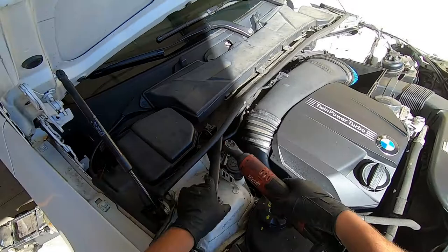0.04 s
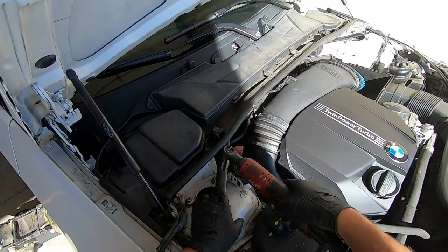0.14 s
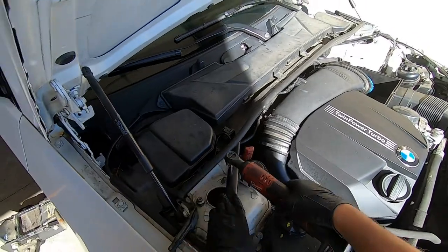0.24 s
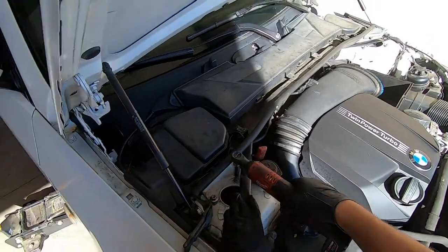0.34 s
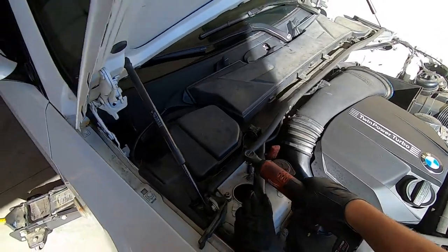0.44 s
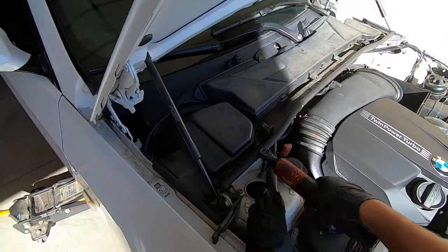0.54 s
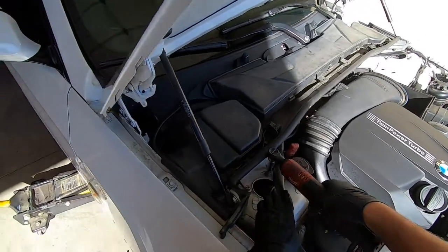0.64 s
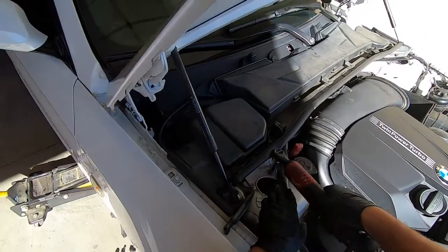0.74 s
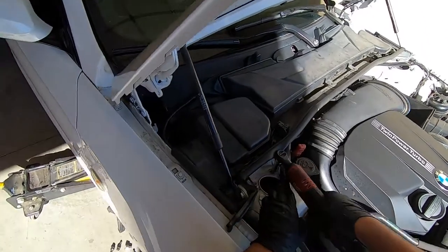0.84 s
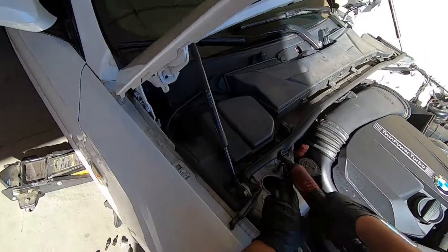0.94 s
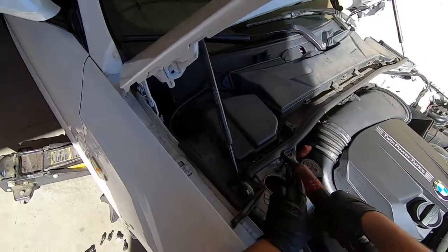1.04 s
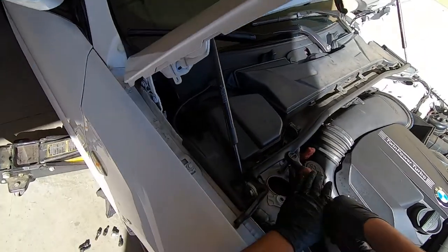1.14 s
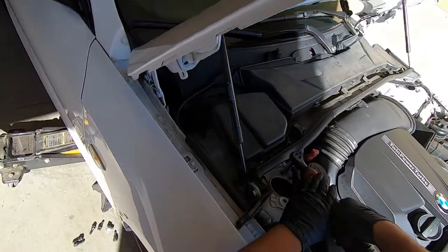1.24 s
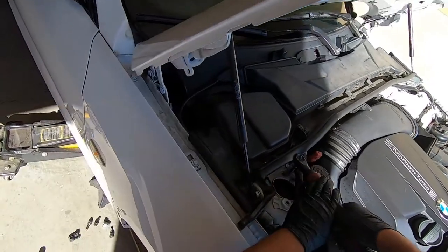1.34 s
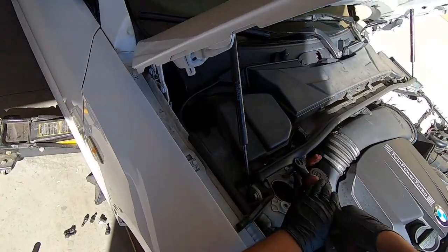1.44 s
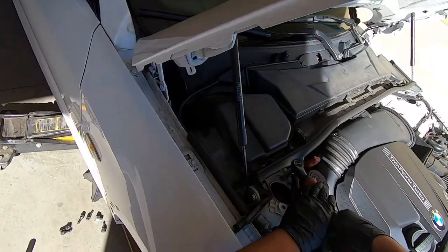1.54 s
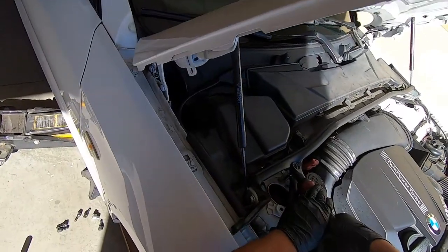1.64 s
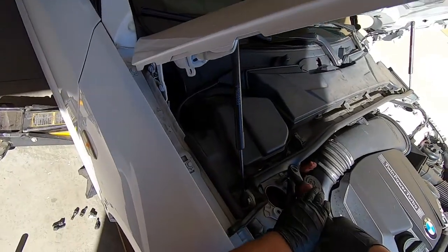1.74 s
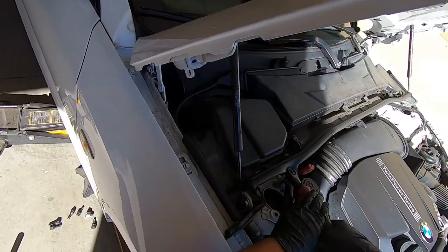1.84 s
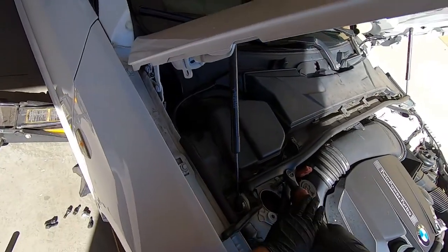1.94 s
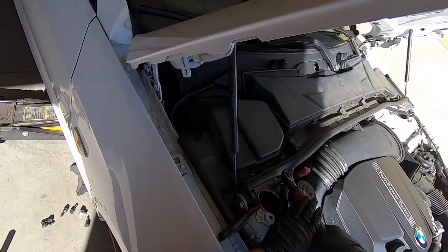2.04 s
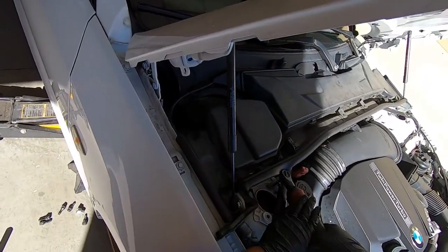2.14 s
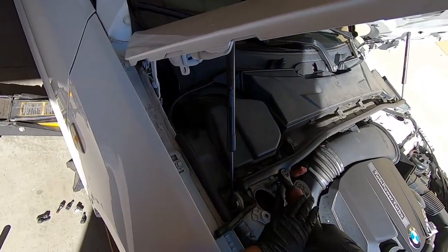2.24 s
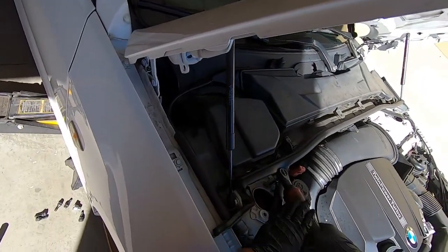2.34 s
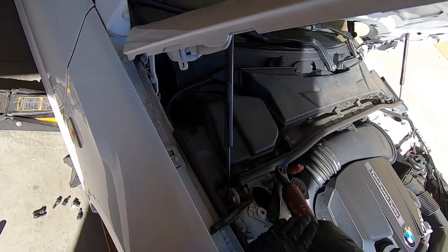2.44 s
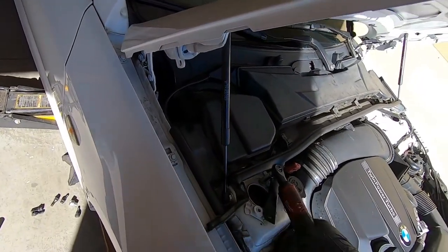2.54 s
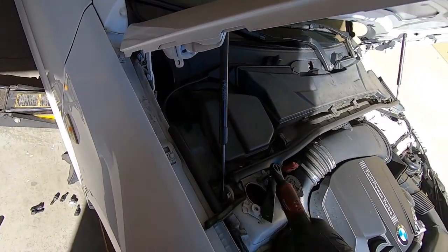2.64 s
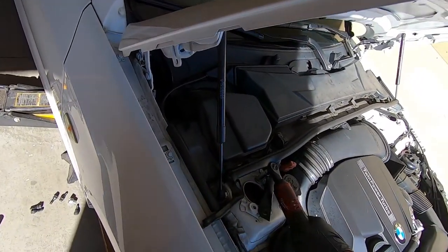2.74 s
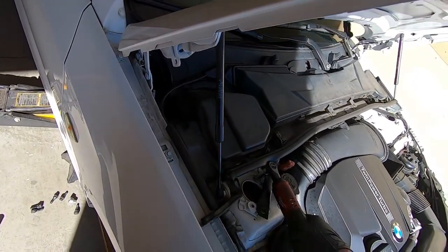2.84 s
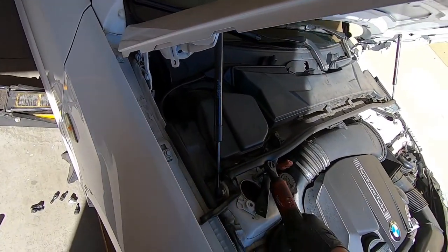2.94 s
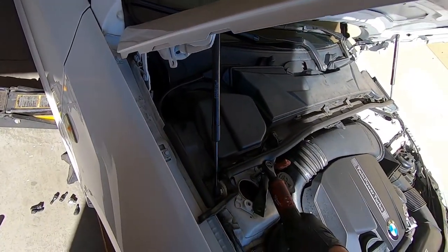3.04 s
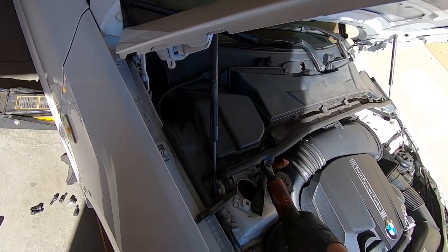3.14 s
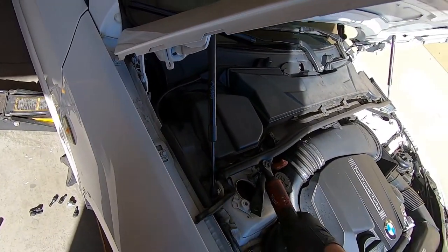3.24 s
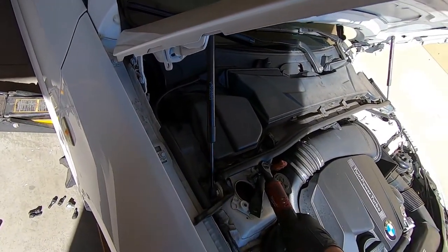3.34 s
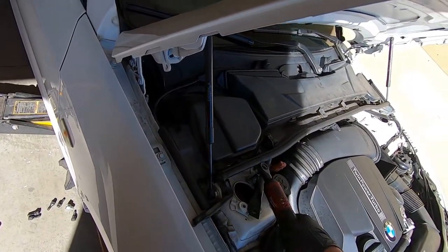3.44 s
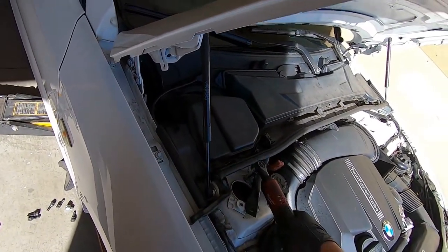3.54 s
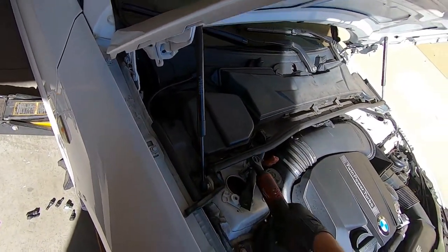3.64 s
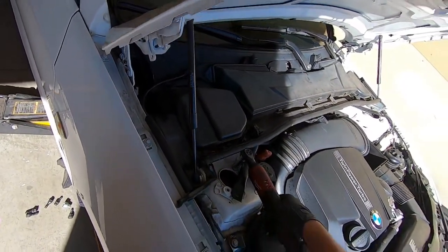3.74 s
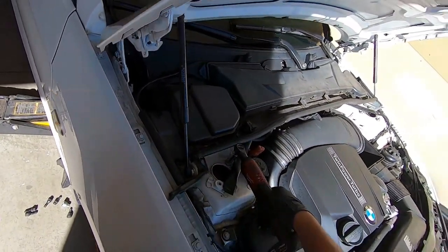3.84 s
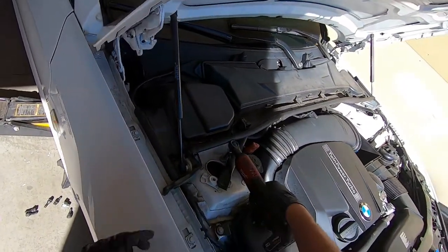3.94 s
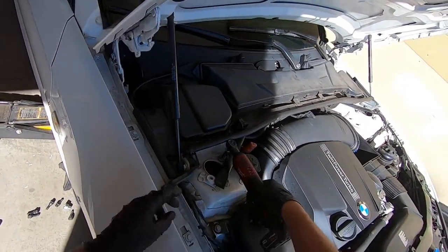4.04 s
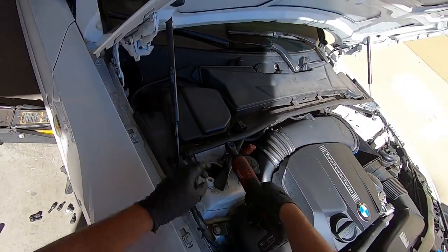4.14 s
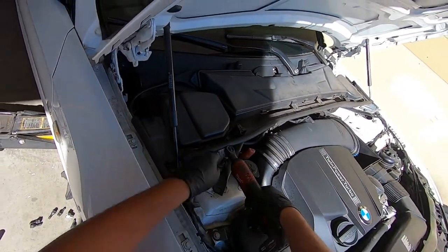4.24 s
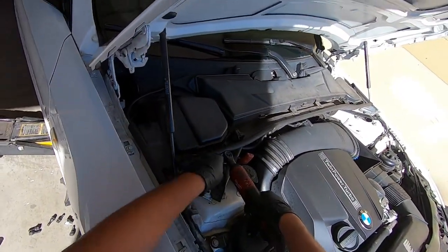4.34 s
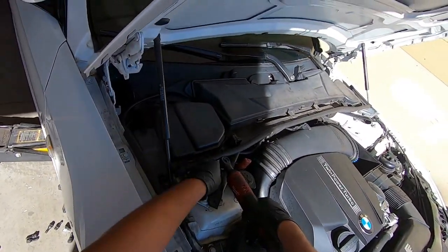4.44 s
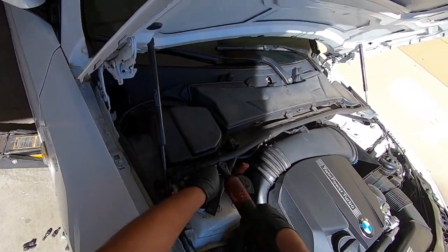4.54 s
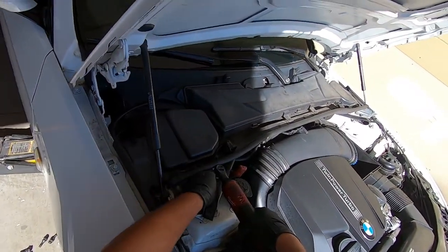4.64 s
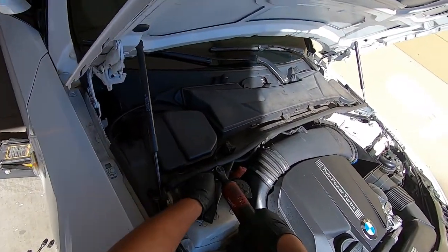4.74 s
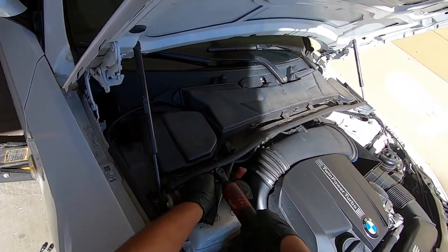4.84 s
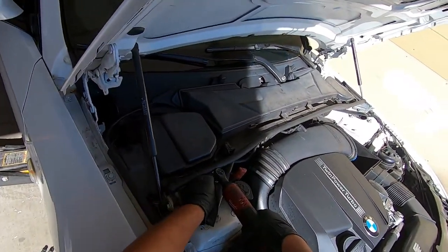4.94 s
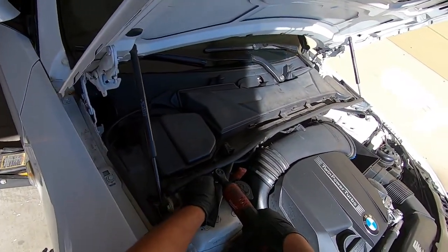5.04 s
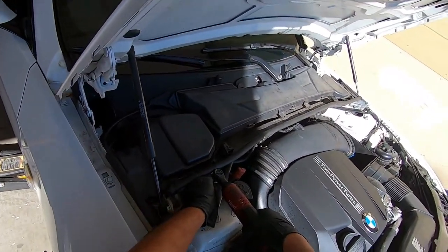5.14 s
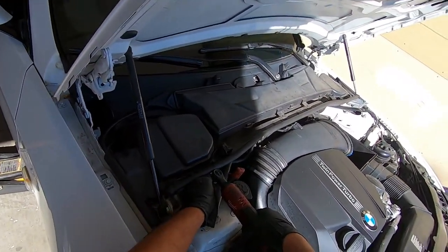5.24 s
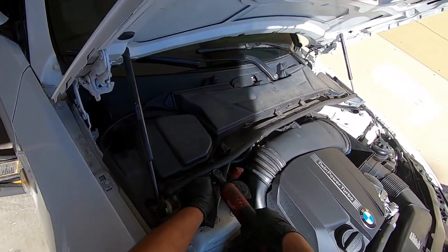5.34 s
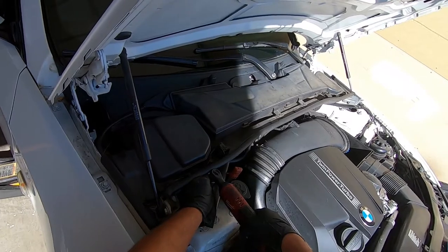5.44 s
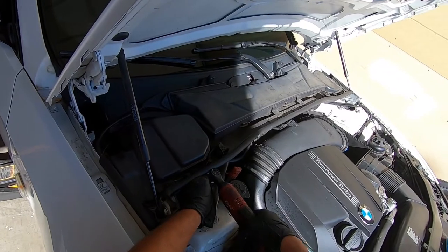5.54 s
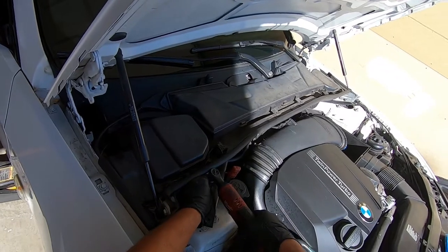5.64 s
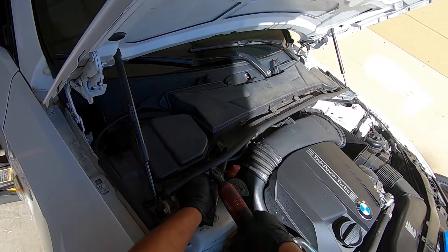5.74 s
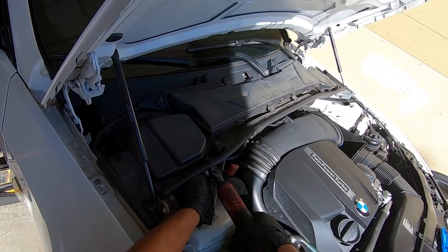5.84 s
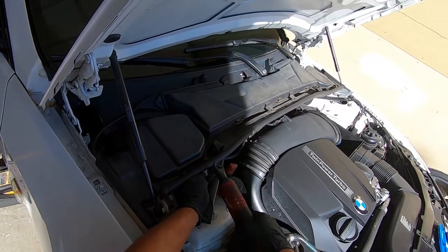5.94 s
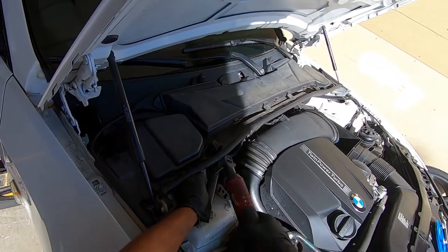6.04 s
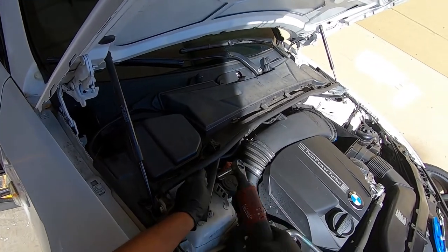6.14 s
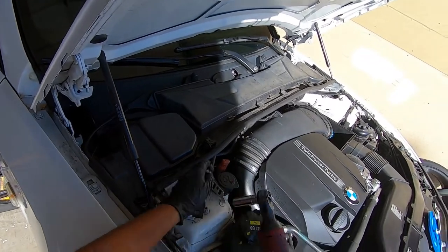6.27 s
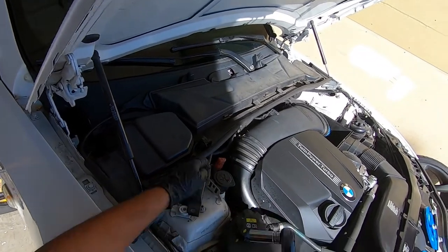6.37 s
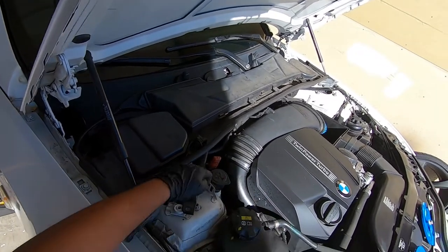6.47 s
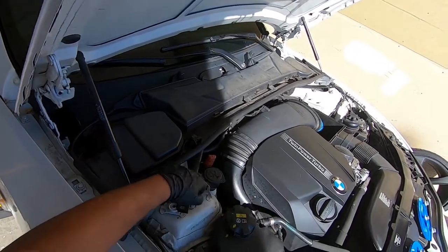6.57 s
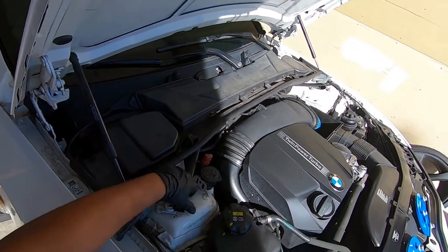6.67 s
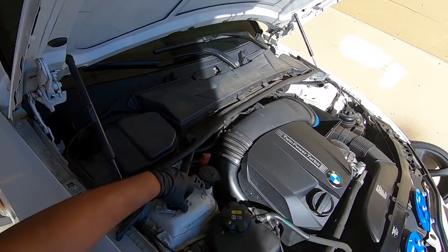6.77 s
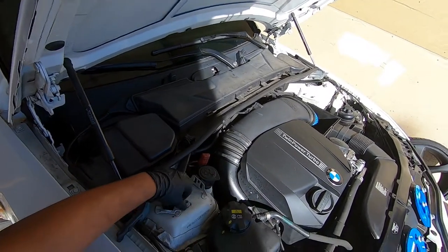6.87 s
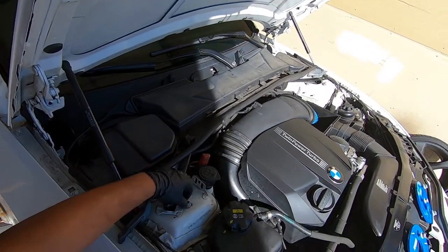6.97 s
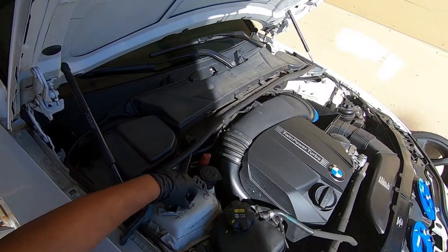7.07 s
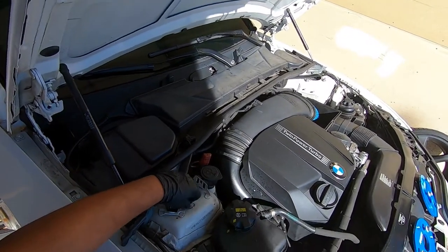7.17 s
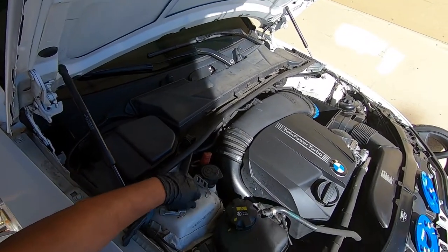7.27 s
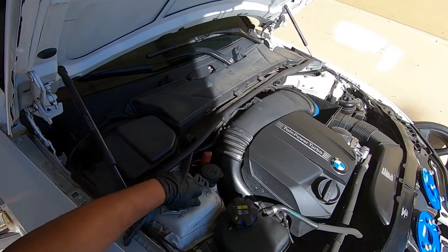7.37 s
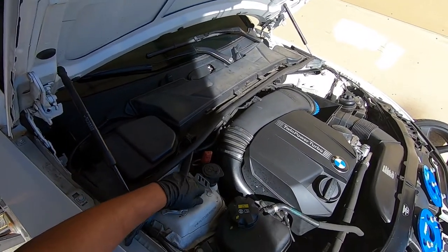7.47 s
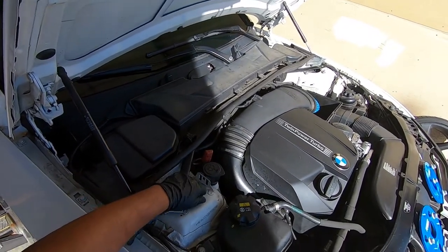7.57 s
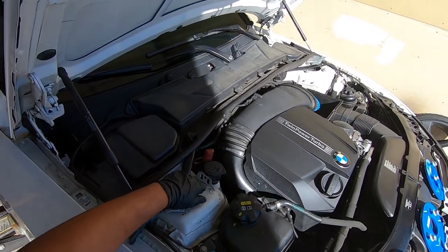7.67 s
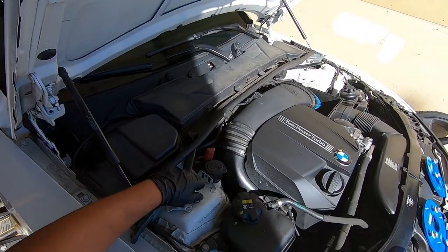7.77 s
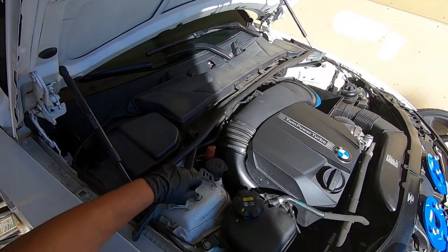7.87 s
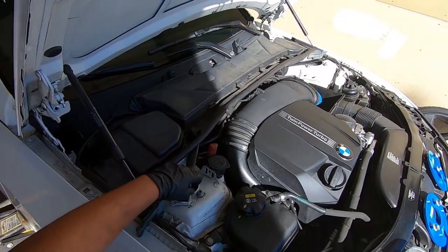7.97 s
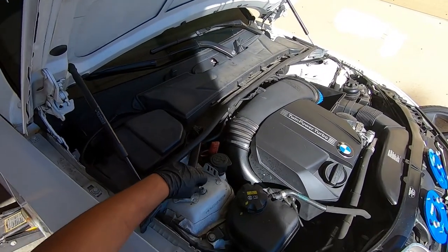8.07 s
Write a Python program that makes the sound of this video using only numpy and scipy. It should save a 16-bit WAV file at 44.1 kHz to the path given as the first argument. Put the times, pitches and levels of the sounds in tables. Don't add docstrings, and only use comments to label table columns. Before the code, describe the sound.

Sharp steel knocks, one long buzzing run of a powered ratchet that shudders then spins freer, a final click, and a rattling set-down outdoors.

```python
import sys
import numpy as np
from scipy import signal
from scipy.fft import rfft, irfft
from scipy.io import wavfile
from scipy.ndimage import uniform_filter1d

SR = 44100
rng = np.random.default_rng(int(sys.argv[2]) if len(sys.argv) > 2 else 0)


def to_linear_factor(level_db):
    exponent = np.asarray(level_db, float) / 20
    return 10 ** exponent


def waveform_to_disk(signal):
    frames = np.transpose(np.atleast_2d(signal))
    scaled = np.clip(frames, -1, 1) * 32767
    samples = np.round(scaled).astype(np.int16)
    wavfile.write(sys.argv[1], SR, samples)


N = 357651


def rms_one(x):
    return x / np.sqrt(np.mean(x ** 2) + 1e-20)


def even_level(x):
    return x / np.sqrt(uniform_filter1d(x ** 2, size=6000) + 1e-9)


def in_time(rows):
    s, *columns = np.transpose(rows)
    return [np.interp(np.arange(N) / SR, s, c) for c in columns]


def drift(rate):
    r = np.exp(-80 * np.pi * rate / SR)
    slow = signal.lfilter([1], [1, -2 * r, r * r], rng.standard_normal(N // 40 + 2002))[2000:]
    return np.interp(np.arange(N) / 40, np.arange(len(slow)), rms_one(slow))


def colour(x, points, scale=1):
    size = 4096
    hz, db = np.transpose(points)
    bins_hz = np.arange(size // 2 + 1) * SR / size
    log_gain = np.interp(np.log(bins_hz + 1), np.log(hz), scale * db * np.log(10) / 20)
    folded = irfft(log_gain)[:size // 2] * np.r_[1, np.full(size // 2 - 1, 2)]
    return signal.oaconvolve(x, irfft(np.exp(rfft(folded, size))))[:len(x)]


def resonances(x, peaks):
    out = 0
    for k, (hz, width_hz, db) in enumerate(peaks):
        r = np.exp(-np.pi * width_hz / SR)
        poles = [2, -4 * r * np.cos(2 * np.pi * hz / SR), 2 * r * r]
        out = out + (-1) ** k * to_linear_factor(db) * signal.lfilter([1 - r * r, 0, r * r - 1], poles, x + 1e-18)
    return out


def narrow(x, hz, width_hz):
    return resonances(resonances(x, [(hz, width_hz, 0)]), [(hz, width_hz, 0)])


# (time [s], gear-mesh pitch [Hz], whine level [dB])
MOTOR = [(1.45, 2496, -56), (1.6, 3349, -38), (1.65, 3300, -35), (1.7, 3950, -32.5), (1.76, 4135, -34),
         (1.875, 4115, -34), (1.94, 4165, -34.5), (2.9, 4175, -35), (3.05, 4135, -35.5), (3.77, 4230, -37),
         (3.88, 3780, -37), (4.2, 3230, -56), (4.4, 3206, -42), (4.8, 3210, -40), (4.89, 3160, -39),
         (5.02, 3200, -37), (5.45, 3172, -33), (5.59, 2600, -36)]
MESH_PER_TURN = 52.6
COAST_S, COAST_LENGTH_S = 5.5908, .47
COAST_TURNS_PER_S, FRICTION_TURNS_PER_S2, PUSH_TURNS, PUSH_S = 43.21, 88.67, .191, .0161


def crank():
    t = np.arange(N) / SR
    turns = np.cumsum(in_time(MOTOR)[0]) / MESH_PER_TURN / SR
    since = (t - COAST_S).clip(0, COAST_LENGTH_S)
    coast = COAST_TURNS_PER_S * since - FRICTION_TURNS_PER_S2 * since ** 2 / 2
    coast = coast + PUSH_TURNS * (1 - np.exp(-since / PUSH_S))
    return np.where(t < COAST_S, turns - turns[round(COAST_S * SR)], coast)


# (time [s], level [dB])
TOOL_LEVEL = [(1.3, -70), (1.42, -56), (1.45, -43), (1.52, -24.5), (1.64, -20.5), (2.1, -20.5),
              (3.5, -20.5), (3.9, -21.5), (4.4, -22), (5.02, -21.5), (5.5, -22), (5.83, -27.5), (5.92, -34),
              (5.96, -31), (6.0, -38), (6.04, -50)]
# (time [s], panel hum level [dB])
BINDS = [(1.52, -28.5), (1.63, -22), (1.8, -22), (2.16, -27.5), (2.459, -26), (2.74, -23), (3.09, -23),
         (3.42, -27), (3.9, -39), (4.15, -34.5), (4.468, -31.5), (4.71, -33.5), (4.9, -34)]
BIND_DB_PER_S, HUM_UNDER_TOOL_DB, HUM_FREE_DB = 72, -14.5, -8.5
LOAD_GRIND_DB, LOAD_KNOCK_DB, FREE_KNOCK_DB, IDLE_KNOCK_DB = 4.5, -9, 3.5, -5.5
BOLT_FREE_S, FREEING_S, TICK_HELD_DB, TICK_FREE_DB = 3.4, 0.36, -25.5, -16.5


def effort():
    t, (tool_db,) = np.arange(N) / SR, in_time(TOOL_LEVEL)
    bind_db = np.max([db - BIND_DB_PER_S * np.abs(t - s) for s, db in BINDS], axis=0)
    free = ((t - BOLT_FREE_S) / FREEING_S).clip(0, 1)
    calm_db = tool_db + HUM_UNDER_TOOL_DB + HUM_FREE_DB * free
    load = ((bind_db - calm_db) / 16).clip(0, 1)
    grind_db = tool_db - 1.5 + LOAD_GRIND_DB * load
    tick_db = tool_db + TICK_HELD_DB + (TICK_FREE_DB - TICK_HELD_DB) * free
    knock_db = FREE_KNOCK_DB + LOAD_KNOCK_DB * load + IDLE_KNOCK_DB * (t > COAST_S)
    return grind_db, tick_db, np.maximum(bind_db, calm_db), knock_db


# (share of turn [0-1], pawl tick level [dB], yoke knock level [dB])
CONTACTS = [
    (0., 0, -9),
    (.21, 0, -10),
    (.44, -8, 0),
    (.8, -13, -6),
]
LOOSE_PER_TURN, IDLE_LOOSE_DB = 5, -5


def contacts(turns, peaks, column, spread_db, loose_db, burst_s):
    whole = np.arange(np.ceil(turns.min()), turns.max())[:, None]
    chance = rng.standard_normal((len(whole), len(CONTACTS)))
    slack = .015 * np.where(whole < 0, 1, .2) * chance
    fixed = whole + np.array(CONTACTS)[:, 0] + slack
    loose = whole + rng.random((len(whole), LOOSE_PER_TURN))
    at = np.interp(np.c_[fixed, loose], turns, np.arange(N)).astype(int)
    force_db = np.r_[np.array(CONTACTS)[:, column], np.full(LOOSE_PER_TURN, loose_db)]
    force_db = force_db + IDLE_LOOSE_DB * (whole >= 0) * (force_db < -7)
    shared_db = force_db + spread_db / 2 * rng.standard_normal(at.shape).clip(-2, 1.5)
    white, out = rng.standard_normal(N), 0
    for peak in peaks:
        clicks = np.zeros(N)
        clicks[at] = to_linear_factor(shared_db + spread_db * rng.standard_normal(at.shape).clip(-2, 1.5))
        burst = signal.lfilter([1], [1, -np.exp(-1 / (burst_s * SR))], clicks + 1e-18)
        burst = burst * np.roll(white, rng.integers(N))
        out = out + to_linear_factor(1.16 * drift(4.9)) * resonances(burst, [peak])
    return out


# (pitch [Hz], width [Hz], level [dB])
PAWL = [(8600, 440, 1), (10500, 400, -3), (11700, 600, -2), (12650, 800, 4), (13900, 1200, -1)]


def pawl_ticks(turns):
    return even_level(contacts(turns, PAWL, column=1, spread_db=2.8, loose_db=-17, burst_s=.0007))


# (pitch [Hz], width [Hz], level [dB])
YOKE = [(687, 56, -5.5), (1047, 110, -10), (1456, 156, -1.5), (1568, 160, 1.5), (1985, 340, -2),
        (2355, 220, -4), (2850, 250, 1.5), (3230, 180, 1), (3650, 400, -1.5), (4600, 680, -7.5),
        (5300, 40, -2), (6700, 1090, -3), (7430, 170, -3.5), (8080, 340, -7.5)]
# (pitch [Hz], width [Hz], level [dB])
YOKE_LOADED = [(1620, 1800, 0.0032)]
YOKE_RELIEF = 0.37


def yoke_knocks(turns, fast):
    yoke = contacts(turns, YOKE, column=2, spread_db=3.2, loose_db=-11, burst_s=.0012)
    free = np.arange(N) / SR > BOLT_FREE_S
    return even_level(yoke - YOKE_RELIEF * (1 - fast) * free * resonances(yoke, YOKE_LOADED))


# (pitch [Hz], level [dB per Hz])
GRIND_FAST = [(88, -47), (150, 0), (175, -2), (339, -7.5), (472, -7), (830, -4), (1200, -9.5), (1550, -5),
              (2250, -8.5), (4080, -4), (4960, -12.5), (7320, -12.5), (12900, -31.5), (15600, -54.5)]
GRIND_SLOW = [(88, -36.5), (150, -9), (182, -5.5), (333, -10), (367, -3.5), (1090, -5), (1490, -6),
              (1810, -3), (3170, 0), (4160, -3.5), (7910, -6.5), (12900, -28.5), (15600, -51.5)]
# (pitch [Hz], width [Hz], level [dB])
GRIND_SWAY = [(450, 500, -10), (1500, 1200, -13), (3000, 2000, -16), (7000, 4000, -12)]


def gear_grind(teeth, fast):
    grind = fast * rms_one(colour(teeth, GRIND_FAST)) + (1 - fast) * rms_one(colour(teeth, GRIND_SLOW))
    return grind + sum(drift(13) * resonances(grind, [part]) for part in GRIND_SWAY)


# (multiple of crank speed, level over grind [dB])
STEADY_FAST = [(4, -20), (5, -27), (6, -25), (7, -24), (10, -26), (13, -22)]
STEADY_SLOW = [(3, -21), (4, -23), (6, -22)]


def crank_tones(turns, fast, driven, grind_db):
    slow = (1 - fast) * driven * (np.arange(N) / SR > BOLT_FREE_S)
    out = 0
    for orders, share in ((STEADY_FAST, fast), (STEADY_SLOW, slow)):
        for k, db in orders:
            wave = np.sin(2 * np.pi * k * turns + .9 * drift(5))
            out = out + share * to_linear_factor(grind_db + db + 3.8 * drift(4)) * wave
    return out


def gear_whine(mesh_hz, whine_db, fast, driven):
    slowing = np.clip(np.abs(np.gradient(uniform_filter1d(mesh_hz, size=2000))) * SR / 6000, 0, 1)
    mesh = 2 * np.pi * (np.cumsum(mesh_hz + 4 * drift(3)) / SR + .008 * drift(60))
    level = to_linear_factor(whine_db - 2 * slowing + 7 + drift(25))
    second_stage = fast * to_linear_factor(-5 + 1.5 * drift(7)) * np.sin(.753 * mesh)
    return driven * level * (np.sin(mesh) + second_stage)


# (pitch [Hz], level [dB per Hz])
THUD = [(24, -46.5), (40, 1.5), (123, 4.5), (241, -5.5), (285, -6), (434, -1.5), (700, -11), (910, -32.5),
        (1540, -120)]
# (pitch [Hz], width [Hz], level [dB])
PANEL_BOOM = [(176.7, 27.4, -3)]
# (multiple of crank speed, level [dB])
HUM_FAST = [(1, 8), (2, 1.5), (3, 1.5)]
HUM_SLOW = [(1, -11), (3, -24.5)]


def panel_hum(turns, fast):
    hum = rms_one(colour(rng.standard_normal(N), THUD)) * to_linear_factor(2.0)
    hum = hum + resonances(4.6 * hum, PANEL_BOOM)
    hum = signal.sosfilt(signal.butter(2, 48, "high", fs=SR, output="sos"), hum)
    for orders, share in ((HUM_FAST, fast), (HUM_SLOW, 1 - fast)):
        for k, db in orders:
            wave = np.sin(2 * np.pi * k * turns + 1.1 * drift(6))
            hum = hum + share * to_linear_factor(db + 1.5 * drift(8)) * wave
    return hum


# (pitch [Hz], level [dB])
CHOPPER = [(1825, -46.5), (3677, -43.5), (5534, -56), (7370, -59)]
# (time [s], tone level [dB], housing moan level [dB])
CHOPPER_ON = [(1.293, -44, -70), (1.3, -7.5, -63), (1.33, -9, -40), (1.38, -7, -37), (1.45, -13, -34.5),
              (1.52, -39, -24), (1.7, -60, -27), (1.8, -56.5, -74)]
# (pitch [Hz], width [Hz], level [dB])
MOAN = [(990, 31, -1), (1600, 70, 5), (2300, 1300, -12.5)]
CHOPPER_DULLING_DB_PER_S = 60


def motor_start(teeth, on):
    t, (tone_db, moan_db) = np.arange(N) / SR, in_time(CHOPPER_ON)
    start_s, full_s, end_s = CHOPPER_ON[0][0], CHOPPER_ON[1][0], CHOPPER_ON[-1][0]
    flutter_db = 45 * (t - start_s).clip(0, .2) * drift(90)
    tones = 0
    for k, (hz, db) in enumerate(CHOPPER):
        dulling_db = (k > 0) * CHOPPER_DULLING_DB_PER_S * (t - full_s).clip(0)
        tones = tones + to_linear_factor(db - dulling_db) * np.sin(2 * np.pi * hz * t)
    tones = tones * to_linear_factor(tone_db + 12.5 + flutter_db) * (t > start_s) * (t < end_s)
    return tones + to_linear_factor(moan_db) * rms_one(resonances(teeth, MOAN)) * on


TRIGGER_OFF_S = 5.47


def ratchet():
    turns, t = crank(), np.arange(N) / SR
    on = (t > TOOL_LEVEL[0][0]) & (t < TOOL_LEVEL[-1][0])
    driven = (t > MOTOR[0][0]) & (t < TRIGGER_OFF_S)
    grind_db, tick_db, hum_db, knock_db = effort()
    mesh_hz, whine_db = in_time(MOTOR)
    fast = np.clip((mesh_hz - 3300) / 700, 0, 1)
    chatter_db = 1.27 * np.cos(2 * np.pi * (turns - .45)) + 0.16 * np.cos(4 * np.pi * turns)
    teeth = rng.standard_normal(N) * to_linear_factor(chatter_db + 2.1 * drift(250))
    body = to_linear_factor(grind_db - 3.0) * (gear_grind(teeth, fast) + to_linear_factor(knock_db) * yoke_knocks(turns, fast))
    body = body + crank_tones(turns, fast, driven, grind_db)
    clicks = to_linear_factor(tick_db + 3.0 - 15.0 * (t - COAST_S).clip(0)) * pawl_ticks(turns)
    whine = gear_whine(mesh_hz, whine_db, fast, driven)
    hum = to_linear_factor(hum_db - 10.0) * panel_hum(turns, fast)
    return on * (body + clicks + whine + hum) + motor_start(teeth, on)


# (pitch [Hz], level [dB per Hz])
CRACK = [(180, -39), (300, -8.5), (1060, -1.5), (1310, -4.5), (2920, -1), (5260, -4.5), (6100, -11),
         (8320, -23), (15000, -52.5)]
THUD_DB_PER_OCTAVE = -7.5


def knocks(table, modes, hollow, t60, ring_db, thud_gain_db, boom_db, crack_db):
    crack, edge, thud, out = np.zeros((4, N))
    t, (mode_hz, mode_db, mode_t60) = np.arange(12500) / SR, np.transpose(modes)[:, :, None]
    beat = 1 + .6 * np.cos(2 * np.pi * 0.011 * mode_hz * t) + .35 * np.cos(2 * np.pi * 0.027 * mode_hz * t)
    for s, db, hz, edge_db in table:
        i = round(s * SR)
        n = min(len(t), N - i)
        noise, chance = rng.standard_normal((3, len(t))), rng.standard_normal((2, len(modes), 1))
        dying = to_linear_factor(db - 60 * t / t60) * np.minimum(t / 0.00027, 1)
        crack[i:i + n] += (dying * noise[0])[:n]
        edge[i:i + n] += (to_linear_factor(edge_db) * dying * noise[1])[:n]
        thud_db = db + THUD_DB_PER_OCTAVE * np.log2(hz / 1000)
        slower = to_linear_factor(thud_db - 60 * t / (0.14 + t60)) * np.minimum(t / 0.0066, 1)
        thud[i:i + n] += (slower * noise[2])[:n]
        struck_db = db + ring_db + mode_db + 0.33 * chance[0] - 4.1 * np.abs(np.log2(mode_hz / hz))
        waves = np.sin(2 * np.pi * mode_hz * t + 3 * chance[1])
        ring = np.sum(beat * to_linear_factor(struck_db - 60 * t / mode_t60) * waves, axis=0)
        ring = ring * np.minimum(t / 0.0026, 1)
        out[i:i + n] += (ring + to_linear_factor(5) * narrow(dying * noise[0], hz, 700))[:n]
    edge = signal.sosfilt(signal.butter(4, [6000, 10000], "band", fs=SR, output="sos"), edge + 1e-18)
    panels = colour(thud, hollow) + to_linear_factor(boom_db) * resonances(thud + 1e-18, PANEL_BOOM)
    return out + to_linear_factor(crack_db) * colour(crack, CRACK) + to_linear_factor(-5.5) * edge + to_linear_factor(thud_gain_db) * panels


TAKE_UP = [(1.3848, -25, 7390, -15.5), (1.3999, -20, 6120, -14), (1.416, -23.5, 7380, -5.5),
           (1.4661, -18, 1850, -11), (1.4866, -16.5, 1890, -12), (1.4916, -12.5, 1520, -24),
           (1.5116, -9, 940, -24.5), (1.43, -24.5, 600, -26.5), (1.53, -17.5, 760, -25.5),
           (1.575, -17, 700, -24), (1.63, -16.5, 800, -26), (1.66, -16.5, 450, -24)]
TAPS = [
    (1.2496, -39, 1420, -3),
    (6.4748, -41, 805, -10),
    (6.6012, -42.5, 2570, -7),
    (6.752, -52, 956, 2.5),
    (7.4704, -54, 3500, -16),
    (7.7494, -61.5, 3000, -5),
    (7.962, -53, 4500, -15),
]
TOUCHES = [
    (1.0182, -22, 990, -35),
    (1.1847, -36, 1620, -26),
    (1.227, -35, 1900, -21),
    (6.1864, -37, 4600, -10),
    (6.2097, -24, 700, -30),
    (6.2115, -32.5, 2870, -28),
    (6.4465, -41, 3500, -21),
    (7.483, -54, 3600, -30),
    (7.703, -65, 7000, 1),
]
SNAPS = [
    (0.8575, -27, 5950, -15),
    (0.8624, -9, 3000, -29),
    (0.9579, -4.5, 3170, -4),
    (0.9765, -23, 3000, 6),
]
LAST_CLICK = [
    (5.9917, -21.5, 5300, -20),
]
SOCKET = [(2190, -11.5, .08), (2970, 5.5, 0.073), (3970, -6, .08), (4300, 1, 0.1), (5600, -12, 0.14),
          (6390, -22, 0.059), (7250, -0.5, 0.12)]
SNAPPED = [(1750, 8, .06), (2070, 1.5, 0.079), (2660, -2, .06), (3070, 1, .08), (3400, -3, .05),
           (3898, 6, .08), (4620, -7, 0.12), (5940, -9, 0.12), (6500, 0, 0.055), (8150, -19, .1),
           (9259, -20, .1)]
LATCH = [(2820, -7, .05), (3970, 1, .07), (5320, 1, 0.092), (6600, -16, 0.084), (8900, -21, .15),
         (9598, -21, .15), (10470, -24, .15), (11040, -25, .15), (13000, -26, .12), (14200, -26, .12)]


def tool_knocks():
    out = knocks(TAKE_UP, SOCKET, THUD, t60=0.043, ring_db=-31.5, thud_gain_db=10.5, boom_db=3.5, crack_db=4.5)
    out += knocks(TAPS, SOCKET, THUD, t60=0.039, ring_db=-28, thud_gain_db=2.0, boom_db=16.0, crack_db=2.0)
    out += knocks(TOUCHES, SOCKET, THUD, t60=0.042, ring_db=-17, thud_gain_db=5.5, boom_db=5.5, crack_db=-16)
    out += knocks(SNAPS, SNAPPED, THUD, t60=0.021, ring_db=-20, thud_gain_db=4.0, boom_db=21.0, crack_db=3.0)
    out += knocks(LAST_CLICK, LATCH, THUD, t60=0.04, ring_db=-5, thud_gain_db=0.5, boom_db=5, crack_db=-4)
    return out


# (time [s], peak level [dB], colour [Hz])
TICKS = [(0.0881, -33, 11000), (0.3795, -41, 12000), (0.596, -30, 12000), (0.958, -39, 13000),
         (1.178, -58, 12000), (1.228, -44, 2200), (1.4005, -26, 12000), (1.417, -22, 11000),
         (1.4665, -34, 11000), (1.475, -34, 11000), (1.484, -32, 11000), (5.882, -36, 7000),
         (5.951, -39, 6500), (5.967, -37, 6500), (5.981, -42, 6500), (6.188, -39, 6500), (6.475, -42, 5000),
         (6.752, -52, 8300), (7.705, -61, 8000), (7.965, -58, 7000)]
TICK_T60_S, TICK_WIDTH = 0.0046, 0.62


def ticks():
    out, t = np.zeros(N), np.arange(600) / SR
    for s, db, hz in TICKS:
        burst = to_linear_factor(db + 1 - 60 * t / TICK_T60_S) * rng.standard_normal(len(t))
        out[round(s * SR):][:len(t)] += narrow(burst, hz, TICK_WIDTH * hz)
    return out


def lifted(modes, gain_db):
    return [(hz, db + gain_db, t60) for hz, db, t60 in modes]


SEATING = [(0.0005, -30, 7300, 2), (0.0074, -22, 2870, -11), (0.0881, -11, 3780, -10),
           (0.0959, -15.5, 1820, -13), (0.104, -28.5, 605, -20), (0.1113, -15.5, 3800, -3),
           (0.3791, -11.5, 4300, -33), (0.382, -13.5, 4440, -26.5), (0.385, -18.5, 2800, -27),
           (0.388, -24.5, 1120, -30), (0.41, -26, 2570, -24)]
CHATTER = [
    (0.595, -24.5, 2850, 3.5),
    (0.599, -23, 3400, -9.5),
    (0.6027, -29, 4180, -12),
    (0.607, -28, 1600, -10),
    (0.612, -29.5, 2630, -3),
    (0.6853, -47, 2820, -22),
]
SEATED = [(1740, 1.5, 0.077), (2000, -10, 0.05), (2450, -18, 0.067), (2870, 7, 0.055), (3500, 3, 0.074),
          (3780, 5, 0.039), (4440, 7.5, 0.075), (5240, -8, 0.11), (5800, -13, .07), (6470, -11, 0.073),
          (7350, -3.5, 0.1), (6400, -2, 0.1), (8540, -15, 0.12), (9300, -20.5, 0.13)]
BRIGHT = [(3460, 4, .12), (5900, -10, .1), (6700, -1.5, .12), (7400, -0.5, .15), (8156, 2, 0.15),
          (8700, -5, 0.11), (9545, -8, .2), (10380, -11, 0.18), (11140, -12, .25), (11650, -11, .15),
          (12300, -14, .12), (12900, -12, .2), (13700, -10, .15), (14400, -7.5, .1)]
EXTENSION = [(1504, 2, 0.033), (1610, 9, 0.05), (2030, 6, 0.032), (2630, 3, .07), (2820, 12, 0.03),
             (3410, 0, 0.05), (4000, 3, 0.07), (4180, 4, 0.037), (5230, 0.5, 0.11), (6530, 0, .05),
             (8200, -2, 0.086), (9700, -23, 0.21), (11200, -17, 0.14), (12900, -25, 0.092)]


def seating():
    modes = SEATED + lifted(BRIGHT, -15)
    out = knocks(SEATING, modes, THUD, t60=0.054, ring_db=-19.0, thud_gain_db=18.5, boom_db=7, crack_db=2.5)
    return out + knocks(CHATTER, EXTENSION, THUD, t60=0.067, ring_db=-5.5,
                        thud_gain_db=5.0, boom_db=24.5, crack_db=6.5)


LAYING_DOWN = [(6.8673, -41, 1180, -22), (6.8878, -35.5, 1040, -24), (6.9075, -27, 4400, -30),
               (6.9169, -18.5, 2900, -32), (6.9239, -16, 2880, -19), (6.9352, -16.5, 2880, -20.5),
               (6.9493, -23, 3450, -6), (7.003, -23.5, 1050, 3), (7.0125, -15, 2870, -8),
               (7.0214, -19, 2840, 0.5), (7.0354, -15, 4000, 0), (7.0458, -24.5, 4390, -1),
               (7.0622, -30.5, 3040, 12), (7.0792, -31.5, 2540, -23), (7.1025, -42, 1960, -15)]
PANEL = [(350, 4, 0.08), (507, -19, .12), (628, 1.5, 0.075), (1034, 5.5, 0.069), (1496, -3.5, 0.13),
         (2003, -2, 0.075), (2570, -2, 0.12), (2880, 2, 0.13), (3040, -17, 0.124), (3650, -3, 0.14),
         (3980, -6, 0.14), (4410, -2.5, 0.23), (5300, -4, 0.16), (5335, -15, 0.34)]
# (pitch [Hz], level [dB per Hz])
PANEL_THUD = [(35, -58.5), (60, -30), (379, 11), (465, -8), (572, 8.5), (800, -7), (1040, -78),
              (1760, -120)]


def laying_down():
    return knocks(LAYING_DOWN, PANEL + lifted(BRIGHT, -10.5), PANEL_THUD, t60=0.06, ring_db=-7.5,
                  thud_gain_db=11.0, boom_db=-14.0, crack_db=2.5)


# (time [s], level [dB])
HANDS = [(0.0, -29.5), (0.074, -39.5), (0.16, -50.5), (0.69, -58), (0.91, -48), (1.028, -37),
         (1.154, -50.5), (1.4, -61), (5.99, -49), (6.26, -51.5), (6.3, -60.5), (6.82, -68), (6.87, -41.5),
         (7.04, -39), (7.19, -50), (7.32, -52), (7.5, -63), (8.11, -71.5)]
# (pitch [Hz], level [dB])
RUSTLE = [(710, -2.5), (1200, 0.5), (2700, -5.5), (3030, -4), (3870, -4.5), (4570, -5.5), (5400, -8.5),
          (6000, -12.5), (9000, -21.5), (14000, -45)]
# (time [s], length [s], level [dB])
RUBS = [
    (0.27, 0.1, -56.5),
    (1.0, 0.18, -53.5),
    (5.7, 0.41, -47.5),
    (1.245, .03, -52),
    (6.432, 0.085, -58.5),
    (6.5, .1, -60.5),
    (6.77, .1, -63),
    (7.443, .07, -62),
    (7.558, 0.056, -67),
    (7.72, 0.057, -70),
]
# (time [s], length [s], pitch [Hz], level [dB])
SQUEAKS = [
    (6.78, 0.086, 3780, -55),
    (6.793, .07, 4860, -56.5),
]
# (pitch [Hz], width [Hz], level [dB])
FAR_HISS = [(4800, 1700, 0)]


def gloves():
    t, white = np.arange(N) / SR, rng.standard_normal(N)
    grains = white * to_linear_factor(2 * drift(40) + drift(400))
    rubs = sum(to_linear_factor(db) * np.sin(np.pi * ((t - s) / length).clip(0, 1)) for s, length, db in RUBS)
    out = (to_linear_factor(in_time(HANDS)[0] - 1.0) + rubs) * rms_one(colour(grains, RUSTLE))
    hiss = resonances(resonances(white[::-1], FAR_HISS), FAR_HISS)
    out += to_linear_factor(-77.5 + 1.5 * drift(5)) * rms_one(hiss)
    for s, length, hz, db in SQUEAKS:
        swell = np.sin(np.pi * ((t - s) / length).clip(0, 1))
        out += to_linear_factor(db) * swell * rms_one(resonances(white, [(hz, 220, 0)]))
    return out


# (time [s], length [s], top pitch [Hz], end pitch [Hz], level [dB])
CHIRPS = [
    (6.306, 0.05, 4550, 3400, -60),
    (6.335, .085, 4620, 4300, -69),
    (6.39, 0.057, 3550, 2900, -60.5),
    (7.28, .075, 3750, 2950, -58),
    (7.905, .05, 5700, 5100, -74.5),
]
CHIRP_START, CHIRP_TOP_AT = .84, .3


def birds():
    t, out, waver_hz = np.arange(N) / SR, 0, 150 * drift(200)
    for s, length, top_hz, end_hz, db in CHIRPS:
        part = ((t - s) / length).clip(0, 1)
        hz = np.interp(part, [0, CHIRP_TOP_AT, 1], [CHIRP_START * top_hz, top_hz, end_hz]) + waver_hz
        swell = np.sqrt(2 * np.sin(np.pi * part).clip(0))
        out = out + to_linear_factor(db) * swell * np.sin(2 * np.pi * np.cumsum(hz) / SR)
    return out * to_linear_factor(3.2 * drift(60))


# (pitch [Hz], level [dB per Hz])
YARD = [(15, -46), (25, -21.5), (92, -11), (171, -11), (245, -11), (374, -22.5), (405, -20), (753, -21.5),
        (920, -22.5), (3000, -43.5), (3900, -86), (6600, -120)]
YARD_DB, HANDLING_DB = -53.5, -2


def yard():
    middle, left, right = [rms_one(colour(rng.standard_normal(N), YARD)) for _ in "mlr"]
    level = np.hypot(to_linear_factor(YARD_DB), to_linear_factor(in_time(HANDS)[0] + HANDLING_DB))
    return level * to_linear_factor(2.0 * drift(14.0)) * (middle + 0.092 * np.array([left, right]))


def echoes(t60):
    t = np.arange(30000) / SR
    tail = rng.standard_normal(len(t)) * to_linear_factor(-60 * t / t60)
    return tail / np.sqrt(np.sum(tail ** 2))


# (pitch [Hz], level [dB])
SCATTER = [(100, -32), (380, -34), (550, -16), (1100, -13), (2200, -8), (5000, -26), (8000, 2), (13000, -7)]
BAY_T60_S, YARD_T60_S, YARD_ECHO_DB = 0.023, 0.42, -9.5


def yard_echo(x):
    dull = signal.lfilter([.3], [1, -.9, .2], echoes(YARD_T60_S))
    return to_linear_factor(YARD_ECHO_DB) * signal.oaconvolve(x, dull)[:N]


def place(x, pan, scatter_db):
    shift = 2.37 * drift(10.0)
    near = 0
    for turn in (np.sin, np.cos):
        near = near + turn(shift) * signal.oaconvolve(x, echoes(BAY_T60_S)[:4000])[:N]
    far, other = yard_echo(x), yard_echo(x)
    side = colour(to_linear_factor(scatter_db) * near + other, SCATTER)
    return np.array([colour(x, pan, .5) + side, colour(x, pan, -.5) - side]) + far


# (pitch [Hz], left over right [dB])
TOOL_PAN = [(60, -.3), (400, -.8), (650, -4.8), (1200, -10), (2500, -3.2), (4500, -2.5), (8000, -11),
            (13000, -1)]
KNOCK_PAN = [(200, -.3), (1500, -1.5), (8000, -1)]


def scene():
    tool = ratchet() + tool_knocks() + ticks()
    middle = seating() + laying_down() + gloves() + birds()
    return place(tool, TOOL_PAN, scatter_db=2.5) + place(middle, KNOCK_PAN, scatter_db=9.5) + yard()


def band_limit(x):
    return signal.sosfilt(signal.butter(12, 15760, fs=SR, output="sos"), x)


# (pitch [Hz], level [dB])
MICROPHONE = [(30, -18), (60, -2), (13500, -4), (14500, -16), (16000, -11)]
HEADROOM = .8


def record(dry):
    top = signal.cheby2(12, 60, 16250, fs=SR, output="sos")
    heard = HEADROOM * np.tanh(np.array([colour(x, MICROPHONE) for x in dry]) / HEADROOM)
    return band_limit(signal.sosfilt(top, heard))


dry = scene()
out = record(dry)
waveform_to_disk(out)
```